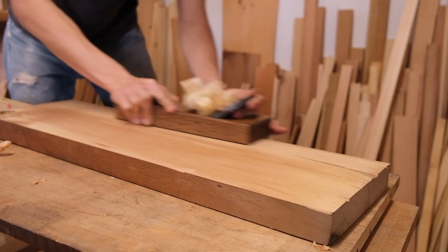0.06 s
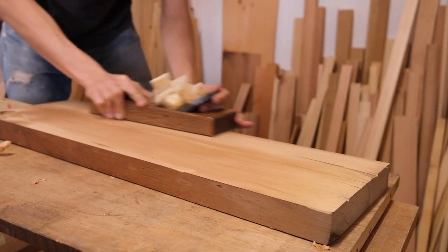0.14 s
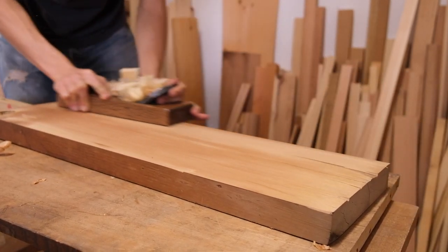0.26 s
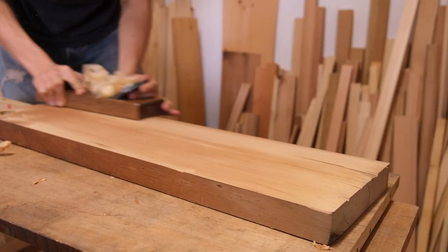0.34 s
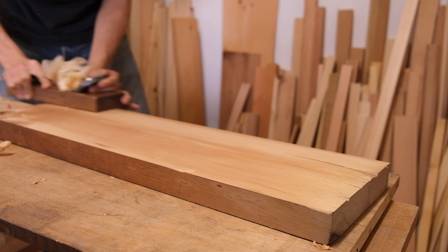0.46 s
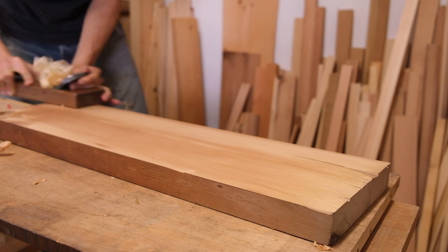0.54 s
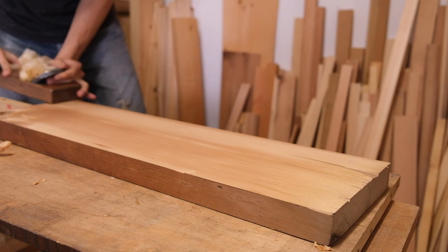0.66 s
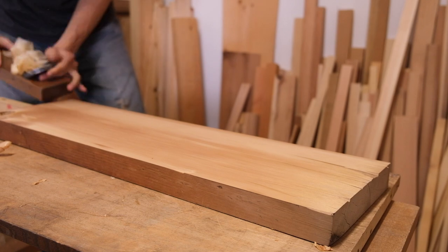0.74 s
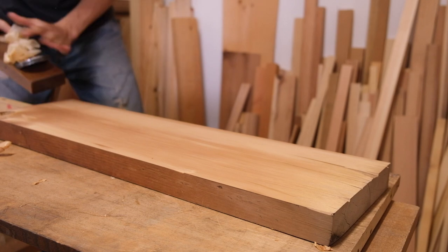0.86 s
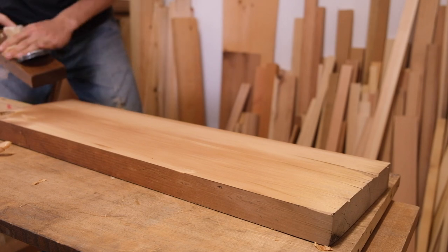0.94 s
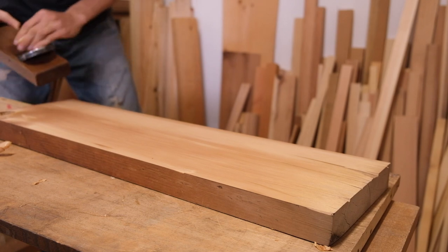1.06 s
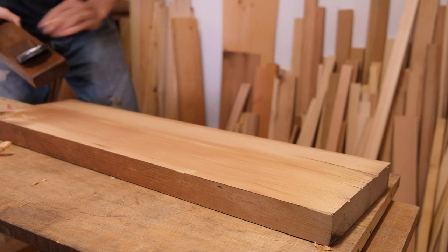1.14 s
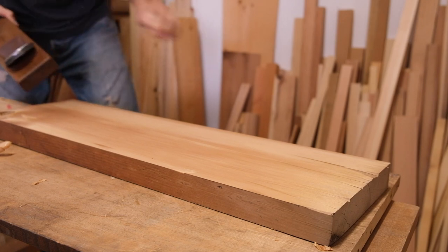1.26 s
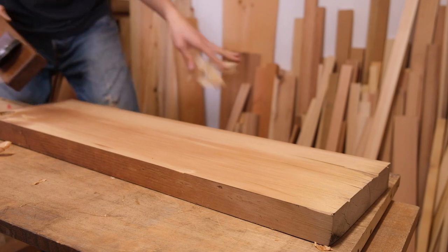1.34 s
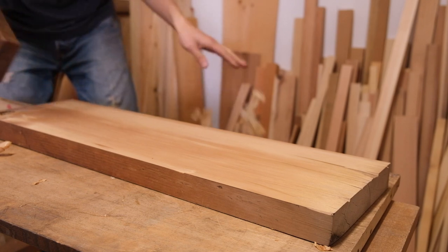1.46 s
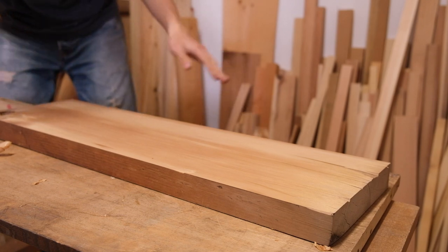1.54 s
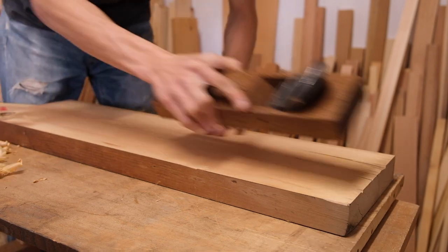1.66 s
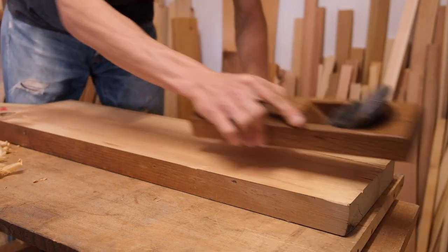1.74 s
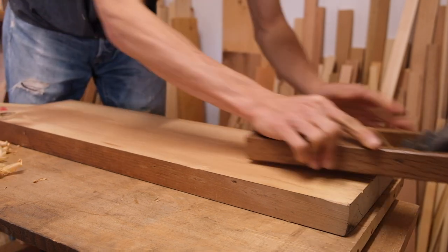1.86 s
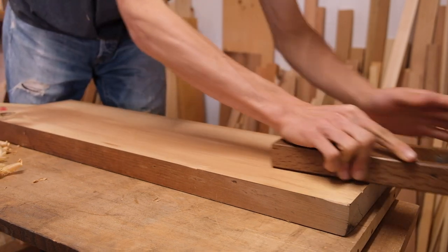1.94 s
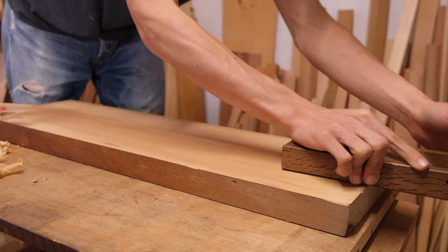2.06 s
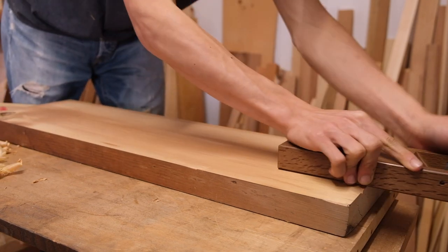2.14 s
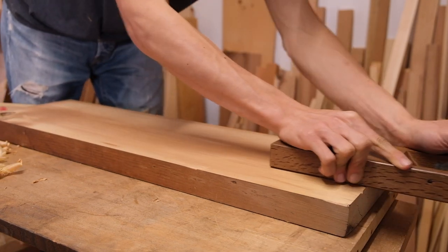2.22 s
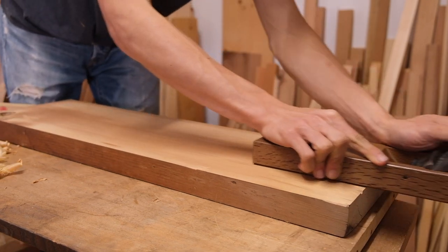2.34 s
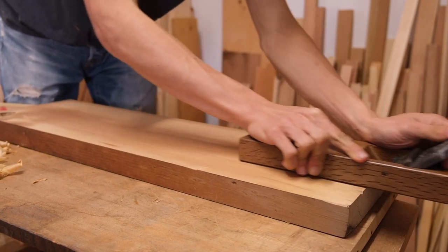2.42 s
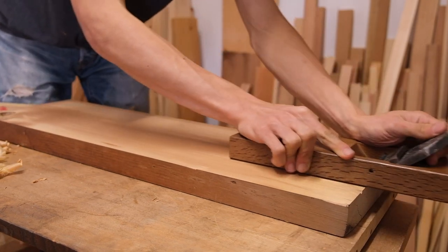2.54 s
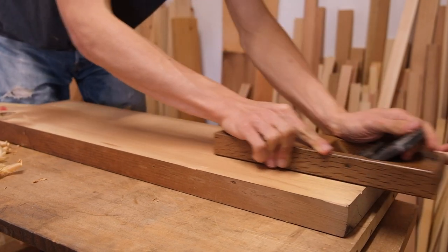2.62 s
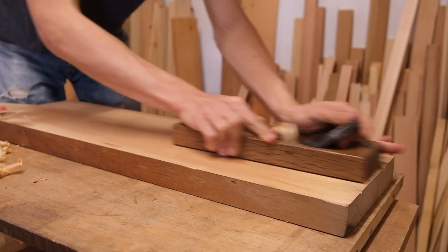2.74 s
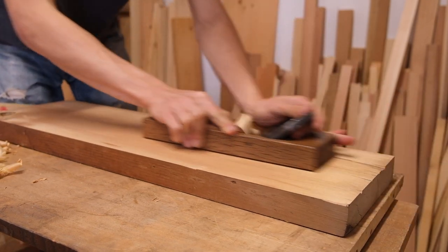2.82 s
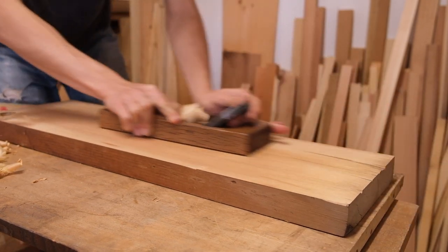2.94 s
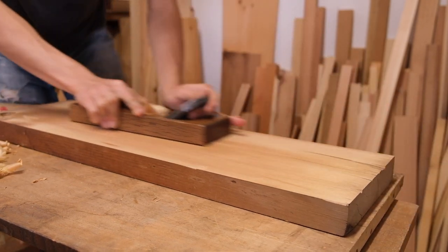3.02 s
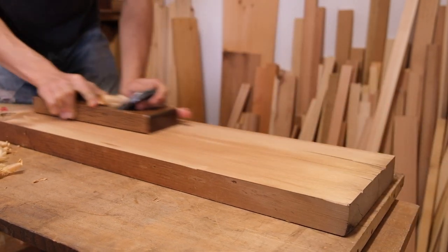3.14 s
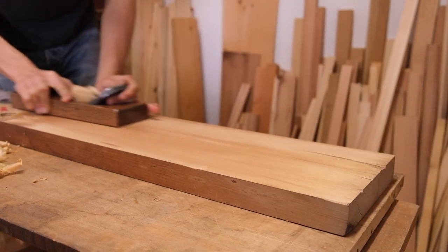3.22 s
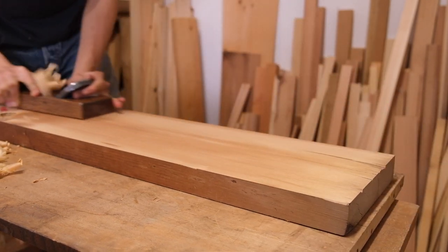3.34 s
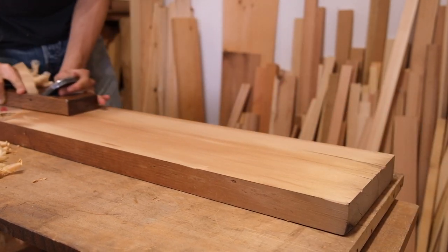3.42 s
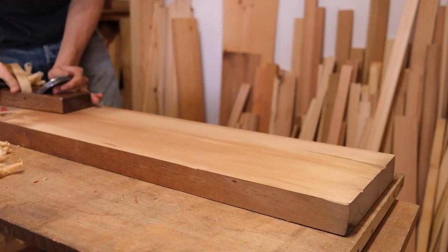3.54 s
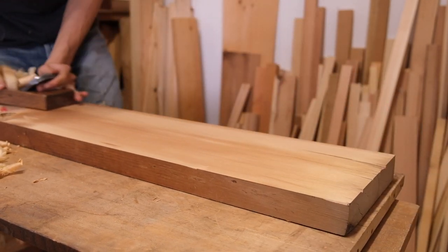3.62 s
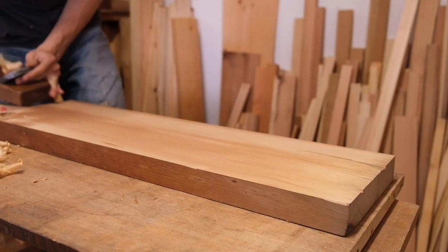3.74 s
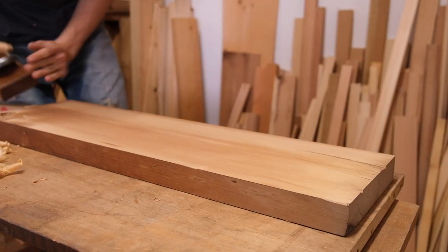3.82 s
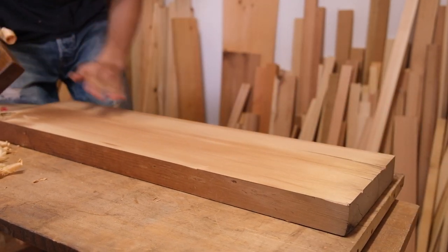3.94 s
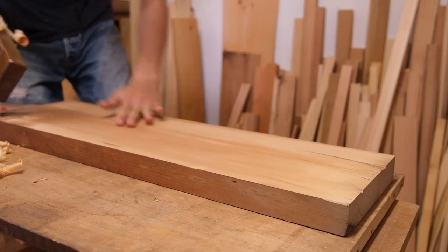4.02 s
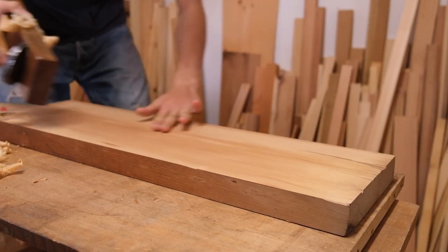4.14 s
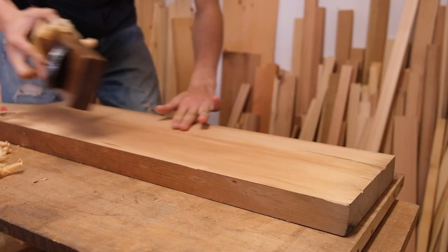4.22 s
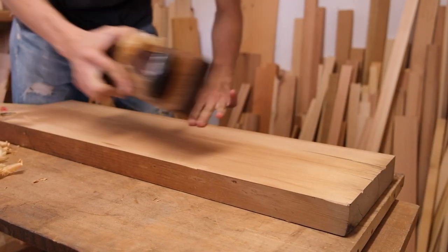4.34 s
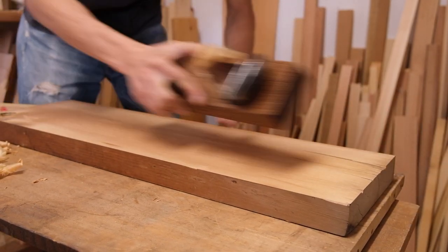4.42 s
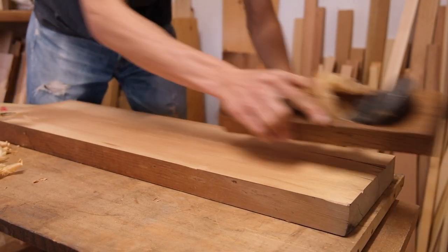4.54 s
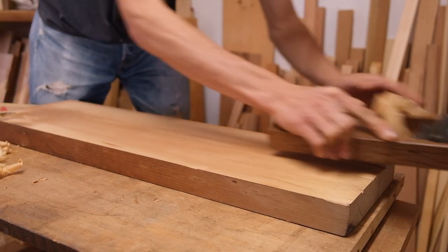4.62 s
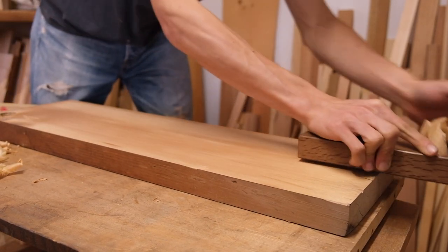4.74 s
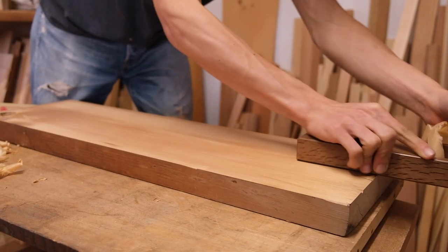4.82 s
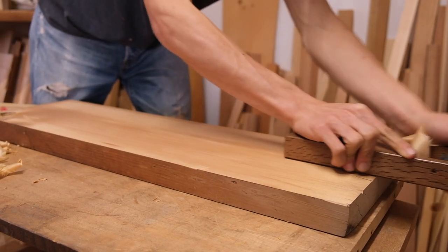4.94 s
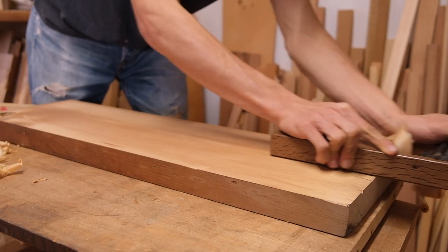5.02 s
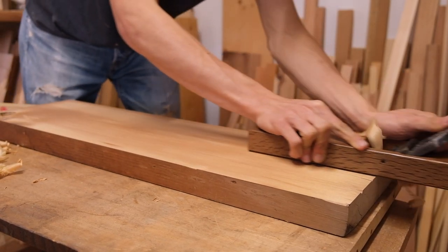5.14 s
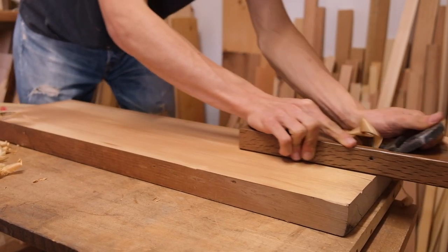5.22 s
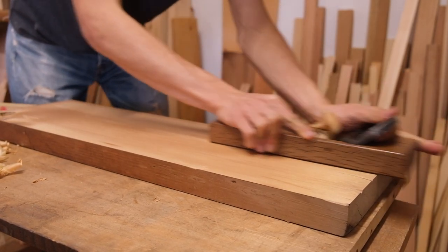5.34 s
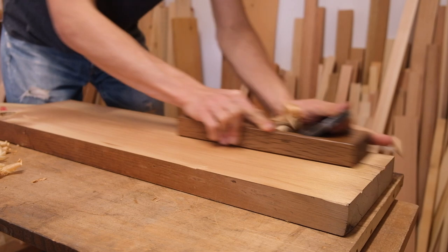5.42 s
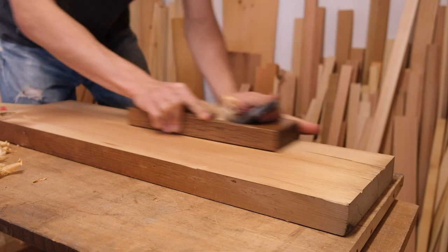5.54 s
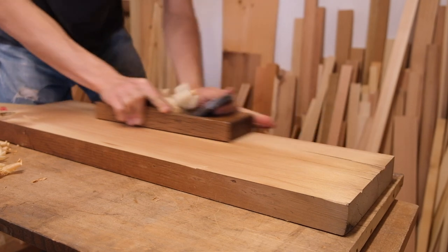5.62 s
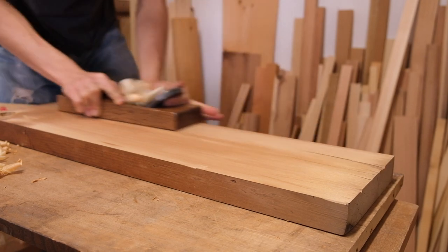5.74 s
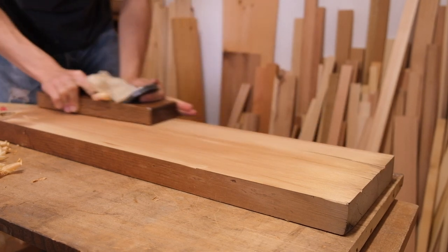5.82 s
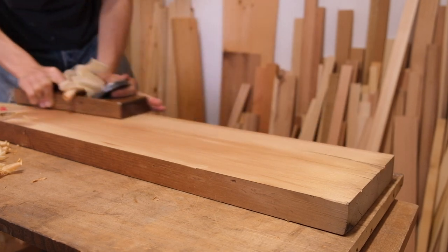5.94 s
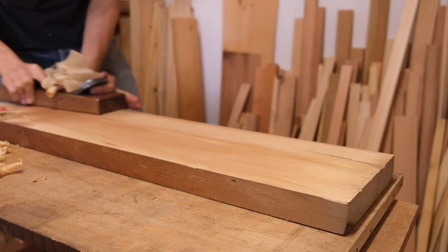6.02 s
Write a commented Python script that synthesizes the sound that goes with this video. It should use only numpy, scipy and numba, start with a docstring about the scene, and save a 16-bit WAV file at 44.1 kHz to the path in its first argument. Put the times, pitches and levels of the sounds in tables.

```python
"""A small workshop, microphone close to the bench, where a wooden hand plane is pulled along a thick board.
In three strokes the blade severs fibres in a dense hiss whose pitch rises with speed; the sole rubs
and chirrs, and shavings rustle in the hand. The plane knocks on the board when set down, with a short
echo off stacked timber, and every shove of hand or foot makes the bench boom over a faint room tone."""
import sys
import numpy as np
from scipy import signal
from scipy.fft import rfft, irfft
from scipy.io import wavfile
from scipy.ndimage import uniform_filter1d
from numba import njit

SR = 44100
rng = np.random.default_rng(int(sys.argv[2]) if len(sys.argv) > 2 else 0)


def file_out(sig):
    """Save sig as 16-bit WAV at sys.argv[1]."""
    # one column per channel
    cols = np.atleast_2d(sig).T
    # limit, then scale
    lim = np.clip(cols, -1, 1)
    pcm = np.round(lim * 32767).astype(np.int16)
    wavfile.write(sys.argv[1], SR, pcm)


N = 268128
BREAK_S = 1.621   # the ring of earlier knocks and shoves breaks off here


def from_db(db):
    """Decibels to gain."""
    return 10 ** (np.asarray(db) / 20)


def rms_one(x):
    """Scale to unit rms."""
    return x / np.sqrt(np.mean(x ** 2) + 1e-20)


def in_time(tables):
    """A gate open only during the tables, then their columns sample by sample."""
    t, rows = np.arange(N) / SR, np.vstack(tables)
    gate = sum((t >= table[0][0]) & (t <= table[-1][0]) for table in tables)
    columns = [np.interp(t, rows[:, 0], column) for column in rows[:, 1:].T]
    return [uniform_filter1d(gate * 1., size=300)] + columns


def colour(x, spectrum):
    """Shape by (f/Hz, level/dB) points on a log-frequency axis; rms 1."""
    hz, db = np.transpose(spectrum)
    bins_hz = np.maximum(np.arange(N // 2 + 1) * SR / N, 1)
    curve_db = np.interp(np.log(bins_hz), np.log(hz), db, left=db[0] - 38, right=db[-1] - 17)
    return rms_one(irfft(rfft(x) * from_db(curve_db), N))


def drift(rate_hz):
    """Slow random wander; rms 1."""
    r = np.exp(-2 * np.pi * rate_hz / SR)
    return rms_one(signal.lfilter([1], [1, -2 * r, r * r], rng.standard_normal(N + SR))[SR:])


def grains(per_s, spread_db, flicker_db):
    """Tiny snaps of uneven size whose level flickers."""
    sizes = from_db(spread_db * np.minimum(rng.exponential(1, N), 4)) * rng.choice([-1, 1], N)
    return sizes * (rng.random(N) < per_s / SR) * from_db(flicker_db * drift(14.4))


def ring(drive, hz, t60):
    """One mode; a unit click rings with height 1."""
    r, w = from_db(-60 / (t60 * SR)), 2 * np.pi * hz / SR
    return signal.lfilter([0, np.sin(w)], [1, -2 * r * np.cos(w), r * r], drive + 1e-18)


@njit
def swept(x, hz, width_hz):
    """A resonance whose centre moves."""
    cosine, r = np.cos(2 * np.pi * hz / SR), np.exp(-np.pi * width_hz / SR)
    out = np.zeros(len(x))
    for i in range(2, len(x)):
        out[i] = x[i] - x[i - 2] + 2 * r * cosine[i] * out[i - 1] - r * r * out[i - 2]
    return out


def plane_body(x, wander_db=0.61):
    """Body and iron colour the friction; each resonance swells and fades as grip and pressure shift."""
    # peaks and dips: f/Hz, width/Hz, lift/dB
    resonances = [(620, 120, -2), (855, 84, 3), (1620, 190, 1), (1310, 640, 5.5), (1900, 350, 6),
                  (2000, 113, 2.5), (2228, 156, -7), (3190, 670, 5.5), (3240, 116, 0.5), (4440, 1220, 5),
                  (4490, 300, 3.5), (6290, 810, 8.5), (5530, 330, -3), (8210, 680, 9.5), (8730, 890, -25)]
    for hz, width_hz, lift_db in resonances:
        b, a = signal.iirpeak(hz, hz / width_hz, SR)
        gain = from_db(lift_db + wander_db * drift(3.2))
        x = x + (gain - 1) * signal.lfilter(b, a, x)
    return rms_one(x)


def planing(fine_spectrum):
    """Fibres part at a fairly even pace, so the hiss has a hump at that pitch; the sole rubs below it."""
    # one list per stroke: t/s, blade level/dB, fibre-severing f/Hz
    strokes = [
        [(0.0, -27, 6300), (0.17, -27.5, 4900), (0.206, -24.5, 5460), (0.238, -31, 4830), (0.28, -29.5, 5230),
         (0.396, -35, 4300), (0.522, -31, 4350), (0.56, -83, 4570)],
        [(2.475, -36, 4080), (2.496, -30, 4000), (2.552, -44.5, 4230), (2.63, -29.5, 3440), (2.72, -24, 4430),
         (2.8, -22, 5000), (2.938, -26, 5360), (3.004, -25, 6100), (3.058, -35, 4960), (3.178, -39.5, 4200),
         (3.212, -33, 4650), (3.358, -28.5, 4440), (3.472, -31.5, 3240), (3.526, -45.5, 4230),
         (3.565, -41, 3730), (3.585, -34, 3820)],
        [(5.15, -33.5, 3570), (5.178, -36, 3700), (5.25, -38.5, 3630), (5.372, -26, 4280), (5.448, -28.5, 5660),
         (5.528, -31, 6240), (5.604, -35, 4600), (5.67, -28.5, 5060), (5.73, -38, 4440), (5.806, -32.5, 4960),
         (5.916, -31, 4600), (6.08, -37, 4240)],
    ]
    # spectrum of the cut: f/Hz, level/dB
    blade_spectrum = [(1500, -59), (2600, -3), (4000, 6.5), (6500, 2.5), (8500, -2.5), (11000, -9)]
    # spectrum of the sliding sole: f/Hz, level/dB
    sole_spectrum = [(200, -13), (500, -8), (900, -5), (1500, -3.5), (2100, -3.5), (2600, -4.5),
                     (4000, -16.5)]
    gate, blade_db, pitch_hz = in_time(strokes)
    swing_db = blade_db + 30   # sole and fine hiss follow a share of the blade's swing
    sole_db = -31 + 0.22 * swing_db
    fine_db = -43 + 0.51 * swing_db + 21 * np.log2(pitch_hz / 4500)
    fibres = grains(per_s=14000, spread_db=1.8, flicker_db=1.0)
    hump = rms_one(swept(fibres, pitch_hz, width_hz=1100))
    blade = plane_body(colour(fibres, blade_spectrum) + from_db(-2.5) * hump)
    sole = plane_body(colour(grains(9000, 3.0, 1.0), sole_spectrum))
    fine = colour(grains(13000, 3.3, 2.1), fine_spectrum)
    return gate * (from_db(blade_db) * blade + from_db(sole_db) * sole + from_db(fine_db) * fine)


def timber(friction, t60=0.063, share=0.23, shift_hz=2.94):
    """The board answers friction with countless close modes; which ones speak keeps shifting."""
    t = np.arange(SR // 8) / SR
    rings = rng.standard_normal((3, len(t))) * from_db(-60 * t / t60)
    weights = np.array([drift(shift_hz) for _ in rings])
    weights /= np.sqrt(np.sum(weights ** 2, axis=0))
    answers = [signal.oaconvolve(friction, r / np.sqrt(np.sum(r ** 2)))[:N] for r in rings]
    return np.sqrt(1 - share) * friction + np.sqrt(share) * np.sum(weights * answers, axis=0)


def chirrs(relative_width=0.12):
    """Wood grips wood: friction locks for a moment onto one resonance."""
    # chirrs and crunches: t/s, length/s, f/Hz, level/dB
    grips = [(.0, 0.095, 6270, -34), (2.584, 0.08, 1720, -30), (2.956, 0.076, 7900, -28),
             (3.25, 0.25, 4670, -31.5), (3.677, 0.067, 1470, -38.5), (4.031, 0.085, 1400, -47.5),
             (4.25, 0.054, 1020, -45), (5.057, 0.086, 1010, -40.5), (5.06, 0.055, 737, -42),
             (5.189, 0.017, 1950, -29), (5.278, 0.1, 3240, -30.5), (5.342, 0.062, 1525, -30.5),
             (5.385, 0.036, 1040, -31), (5.642, 0.052, 10200, -41), (5.886, 0.063, 4700, -29),
             (5.779, 0.16, 1900, -31.5)]
    out = np.zeros(N)
    for (s, length_s, hz, db), noise in zip(grips, rng.standard_normal((len(grips), SR // 2))):
        b, a = signal.iirpeak(hz, 1 / relative_width, SR)
        band = rms_one(signal.lfilter(b, a, signal.lfilter(b, a, noise))[SR // 4:])
        swell = np.sin(np.pi * np.clip(np.arange(len(band)) / SR / length_s, 0, 1)) ** .5
        slot = out[round(s * SR):][:len(band)]
        slot += from_db(db) * (band * swell)[:len(slot)]
    return out


def bench(falloff_db_per_octave=14, free_ring_hz=90):
    """Shoves swell over their push and favour the modes near their pitch; dragging keeps a hum going."""
    # shaking from dragging and leaning: t/s, level/dB
    shaking = [
        [(0.0, -45), (0.7, -40), (1.06, -66), (1.344, -45.5), (1.62, -35), (1.635, -52.5), (1.99, -43.5),
         (2.13, -26.5), (2.26, -38.5), (2.87, -39.5), (3.1, -35), (3.88, -45.5), (4.24, -34), (4.6, -50.5),
         (4.83, -45.5), (4.98, -36), (5.4, -35), (5.66, -40), (6.08, -39.5)],
    ]
    # shoves on bench and floor: t/s, level/dB, favoured f/Hz, push length/s
    shoves = [(0.108, -29.5, 105, 0.0066), (0.172, -22.5, 87, 0.0065), (.479, -19, 129, 0.028),
              (0.518, -16.5, 109, 0.033), (0.702, -15.5, 195, 0.0068), (1.316, -18, 118, 0.018),
              (1.539, -22.5, 131, 0.0051), (1.959, -10, 211, 0.0043), (2.013, -6, 210, 0.0064),
              (2.056, -28, 134, 0.0078), (2.108, -13, 81, 0.015), (2.109, -11.5, 200, 0.004),
              (2.488, -18, 90, 0.018), (3.183, -18.5, 99, 0.011), (3.214, -19.5, 139, 0.0007),
              (3.259, -23, 200, 0.0016), (3.289, -30, 200, 0.0024), (3.466, -11, 80, 0.14),
              (3.573, -17, 160, 0.006), (3.662, -29, 105, 0.0063), (3.912, -38, 107, 0.0031),
              (3.977, -37, 209, 0.0034), (4.088, -40, 131, 0.0053), (4.156, -16, 167, 0.0062),
              (4.223, -28, 116, 0.0051), (4.352, -20.5, 147, 0.0064), (4.819, -13.5, 162, 0.0037),
              (4.817, -20, 75, 0.0046), (4.898, -14, 72, 0.0036), (4.944, -15, 75.6, 0.00077),
              (5.356, -25.5, 90.6, 0.0073), (5.798, -25.5, 160, 0.013)]
    # bench modes: f/Hz, level/dB, t60/s
    modes = [(46.5, -2, 0.25), (80, 2, 0.41), (116.4, 5, 0.41), (160, -4, 0.27), (200, -2.5, 0.25),
             (332.4, -8, 0.21)]
    _, shake_db = in_time(shaking)
    t = np.arange(SR // 2) / SR
    hum, booms = np.zeros(N), np.zeros(N)
    for hz, mode_db, t60 in modes:
        hum += from_db(mode_db) * rms_one(ring(rng.standard_normal(N), hz, t60 * 0.14))
        for s, db, favoured_hz, push_s in shoves:
            ring_s = t60 * min(free_ring_hz / favoured_hz, 1)   # the hand damps higher-pitched shoves
            swell = 1 - np.exp(-t / max(push_s, 1e-3))
            boom = swell * from_db(-60 * t / ring_s) * np.sin(2 * np.pi * hz * t)
            if s < BREAK_S:
                boom *= np.clip((BREAK_S - s - t) / 0.0099, 0, 1)
            loss_db = falloff_db_per_octave * abs(np.log2(hz / favoured_hz))
            slot = booms[round(s * SR):][:len(t)]
            slot += from_db(db + mode_db - loss_db) * boom[:len(slot)]
    return booms + from_db(shake_db) * rms_one(hum)


def room_tone(level_db=-53.5):
    """The shop's faint, steady background, mostly a low rumble."""
    # background spectrum: f/Hz, level/dB
    spectrum = [(26, -34), (45, -51), (129, 1.5), (178, -18), (401, -14.5), (539, -20.5), (1210, -17.5),
                (6140, -26), (16000, -45.5)]
    return from_db(level_db) * colour(rng.standard_normal(N), spectrum)


def handling(fine_spectrum, rise_db_per_s=610):
    """Thin curls crackle as they are pulled out; palms and sole slide on wood."""
    # touches: t/s, hold/s, rub level/dB, rustle level/dB, fine hiss re rustle/dB, fade/(dB/s)
    touches = [(0.527, 0.015, -42, -38, -17, 107), (0.624, 0.06, -36.5, -50, -27, 85),
               (0.963, 0.0046, -34, -27.5, -9.5, 400), (0.997, 0.038, -43, -36.5, -10, 95),
               (1.048, 0.076, -41.5, -34, -12.5, 241), (1.29, 0.021, -64, -47, -3.5, 100),
               (1.305, 0.12, -41.5, -39.5, -13, 248), (1.54, 0.069, -45.5, -39.5, -15, 900),
               (1.623, 0.058, -67, -51, -8, 184), (1.78, .12, -59.5, -60, -13, 50),
               (1.865, .01, -53, -50.5, -15, 50), (1.89, 0.016, -49.5, -42.5, -18, 102),
               (1.969, 0.14, -33, -49, -14, 233), (2.048, 0.014, -46, -39.5, -28, 247),
               (2.127, 1, -46.5, -49, -13, 302), (2.488, 0.023, -29, -40, -30, 167),
               (3.474, 0.018, -35.5, -60, -15, 200), (3.577, 0.024, -34.5, -40, -17, 168),
               (3.672, 0.087, -43, -49, -14, 250), (3.839, 0.024, -45, -47, -15, 130),
               (3.976, 0.016, -47, -56, -8, 98), (4.098, 0.047, -43.5, -46, -13, 68),
               (4.206, 0.096, -51, -55.5, -0.5, 86), (4.356, 0.01, -42, -44.5, -12, 130),
               (4.486, 0.037, -51.5, -55.5, -28, 87), (4.824, 0.054, -36.5, -49.5, -30, 150),
               (4.937, 0.05, -39, -41, -7.5, 200), (4.964, 0.015, -52, -40, -28, 57),
               (5.023, 0.16, -38.5, -40.5, -10.5, 300), (5.19, 0.25, -34.5, -48.5, 1, 146)]
    # crisp rustle of shavings: f/Hz, level/dB
    rustle_spectrum = [(1500, 0), (2600, 2), (4000, 4.5), (6000, 1), (8500, -15.5), (11000, -87)]
    # dull rub on wood: f/Hz, level/dB
    rub_spectrum = [(200, 7.5), (500, 9), (900, 5.5), (1500, 3.5), (2200, 0), (3000, -7.5), (5000, -23.5)]
    t, power = np.arange(N) / SR, 0
    for s, hold_s, rub_db, rustle_db, fine_db, fade in touches:
        loss_db = rise_db_per_s * np.maximum(s - t, 0) + fade * np.maximum(t - s - hold_s, 0)
        gains = from_db([[rub_db], [rustle_db], [rustle_db + fine_db]])
        power = power + (gains * from_db(-loss_db)) ** 2
    crackle = grains(per_s=9000, spread_db=3.1, flicker_db=0.36)
    curls = colour(crackle, rustle_spectrum)
    rustle = rms_one(curls + 1.6 * plane_body(curls))   # part of it sounds through the plane
    rub = plane_body(colour(grains(7000, 0.98, 1.75), rub_spectrum))
    fine = colour(crackle, fine_spectrum)
    return np.sum(np.sqrt(power) * [rub, rustle, fine], axis=0)


def knocks(crack_hz=2200, scuff_db=-16, soft_hz=5500):
    """Each contact is a click and a scuff into the board's modes; the spot struck favours some of them."""
    # wood on wood: t/s, level/dB, favoured f/Hz, falloff/(dB/octave), scuff decay/s
    contacts = [(0.527, -21.5, 1190, 7.5, 0.012), (0.962, -24, 2600, 9, 0.01),
                (1.125, -23, 1700, 10, 0.002), (1.535, -16.5, 500, 24, 0.0067), (1.545, -21, 300, 7, 0.013),
                (1.609, -18.5, 447, 13.5, 0.0094), (1.950, -18.5, 790, 4.5, 0.0057),
                (1.955, -6, 630, 44, 0.015), (1.963, -5, 1190, 16.5, 0.005), (1.951, -22, 1950, 35, 0.036),
                (2.011, -13, 1700, 6, 0.0055), (2.058, -11.5, 1220, 4.5, 0.0072),
                (2.474, -25.5, 1500, 1.5, 0.02), (2.484, -17, 2000, 6, 0.0035),
                (2.495, -10, 1950, 17, 0.0055), (3.545, -9.5, 1580, 31, 0.02), (3.559, -19, 900, 5, 0.0038),
                (3.971, -25, 434, 10, 0.017), (4.08, -35, 450, 1, 0.006), (4.154, -18.5, 500, 6, 0.006),
                (4.166, -18, 330, 10, 0.0083), (4.225, -19, 684, 29, 0.005),
                (4.355, -8.5, 2120, 33, 0.0019), (4.8121, 6.5, 1280, 4.5, 0.00058),
                (4.8176, -12.5, 800, 10, 0.0033), (4.821, -34, 1100, 2, 0.008),
                (4.913, -19.5, 1490, 9.5, 0.003)]
    # board modes: f/Hz, level/dB, t60/s
    modes = [(247, 14.5, 0.028), (380, 2.5, 0.072), (500, 3.5, 0.016), (624, -11, 0.13), (800, 7.5, 0.01),
             (1228, 4, 0.019), (1130, -12.5, 0.033), (1280, -1, 0.025), (1720, 8.5, 0.0046),
             (1950, 6, 0.022), (2120, 8.5, 0.0041), (2090, -3, 0.039), (2600, 2.5, 0.012),
             (3440, 9, 0.0064)]
    t = np.arange(SR // 20) / SR
    drives = np.zeros((len(modes) + 1, N))   # the last row drives the crack
    for s, db, favoured_hz, falloff, scuff_s in contacts:
        scuff = rng.standard_normal(len(t)) * np.exp(-t / scuff_s)
        contact = (t == 0) + from_db(scuff_db) * scuff
        crack_db = -3 + 0.16 * db   # harder blows crack brighter
        for drive, (hz, mode_db, _) in zip(drives, modes + [(crack_hz, crack_db, 0)]):
            loss_db = 14 + falloff * abs(np.log2(hz / favoured_hz))
            drive[round(s * SR):][:len(t)] += from_db(db + mode_db - loss_db) * contact
    crack = signal.sosfilt(signal.butter(2, crack_hz, "high", fs=SR, output="sos"), drives[-1])
    ringing = sum((-1) ** k * ring(drives[k], hz, t60) for k, (hz, _, t60) in enumerate(modes))
    soften = signal.butter(2, soft_hz, fs=SR, output="sos")   # wood yields, so contacts are dull
    return signal.sosfilt(soften, ringing + from_db(15.5) * crack)


def workshop_echo(x):
    """Stacked timber scatters every knock into a dense tail whose bass lasts longest."""
    # room decay by band: top f/Hz, t60/s
    bands = [(900, 0.21), (2200, 0.058), (6000, 0.097)]
    t, tail, low_hz = np.arange(SR // 3) / SR, 0, 100
    onset = np.clip(t / 0.00068, 0, 1)
    for top_hz, t60 in bands:
        bandpass = signal.butter(2, [low_hz, top_hz], "band", fs=SR, output="sos")
        band = signal.sosfilt(bandpass, rng.standard_normal(len(t)))
        tail = tail + band * from_db(-60 * t / t60) * onset
        low_hz = top_hz
    return signal.fftconvolve(x, tail / np.sqrt(np.sum(tail ** 2)))[:N]


def lift_off():
    """The sole scrapes off the end of the board: grains through one resonance that sinks in pitch."""
    # path of the scrape: t/s, level/dB, f/Hz
    glide = [(.58, -42, 1690), (.62, -47, 1700), (.65, -39, 1600), (.70, -41, 1350), (.78, -52, 1260),
             (.85, -46.5, 1060), (.93, -47, 1100)]
    gate, db, hz = in_time([glide])
    scrape = swept(grains(7000, 2.8, 1.0), hz, width_hz=200)
    return gate * from_db(db) * scrape / np.sqrt(np.average(scrape ** 2, weights=gate))


def scene():
    """The bench from close by, in mono; only the knocks raise an echo."""
    # fine hiss of both cutting and handling: f/Hz, level/dB
    fine_spectrum = [(7000, 8.5), (9500, 6), (12000, -1.5), (16000, -8)]
    hits = knocks()
    hits += from_db(-13) * workshop_echo(hits)
    hits[round(BREAK_S * SR):][:SR // 4] = 0
    background = room_tone()
    friction = timber(planing(fine_spectrum) + handling(fine_spectrum) + lift_off())
    return (friction + chirrs() + bench() + hits + background)[None]


def record(dry, bass_hz=40, top_hz=16150):
    """The microphone drops the deepest bass, overloads on the loudest knock and cuts the top."""
    low_cut = signal.butter(4, bass_hz, "high", fs=SR, output="sos")
    high_cut = signal.cheby2(20, 70, top_hz, fs=SR, output="sos")
    clipped = np.clip(signal.sosfilt(low_cut, dry), -.96, .96)
    return signal.sosfilt(high_cut, clipped)


dry = scene()
out = record(dry)
file_out(out)
```